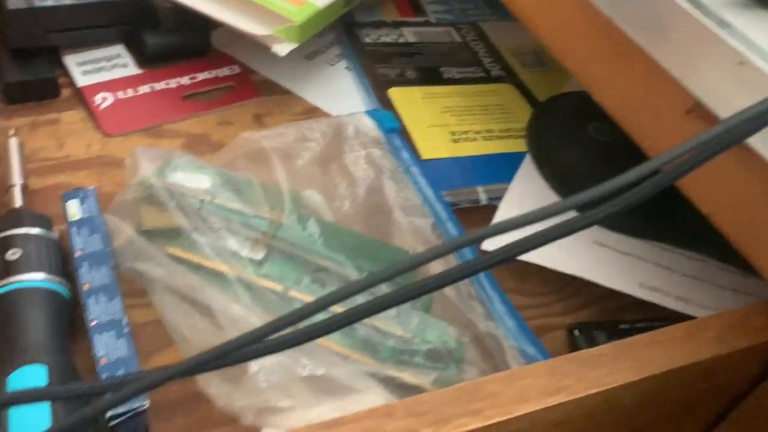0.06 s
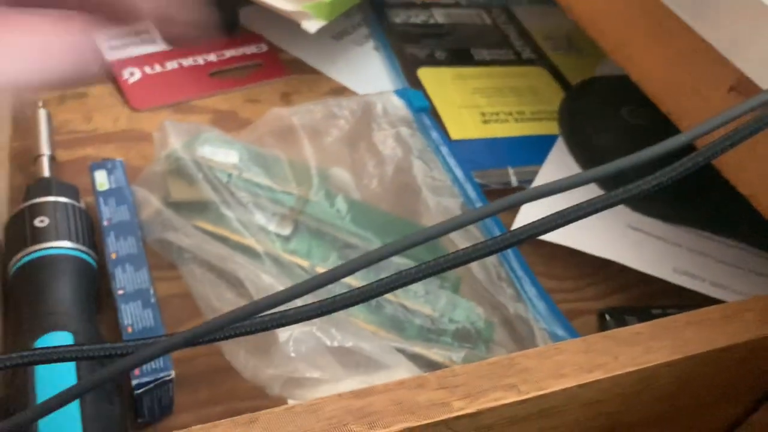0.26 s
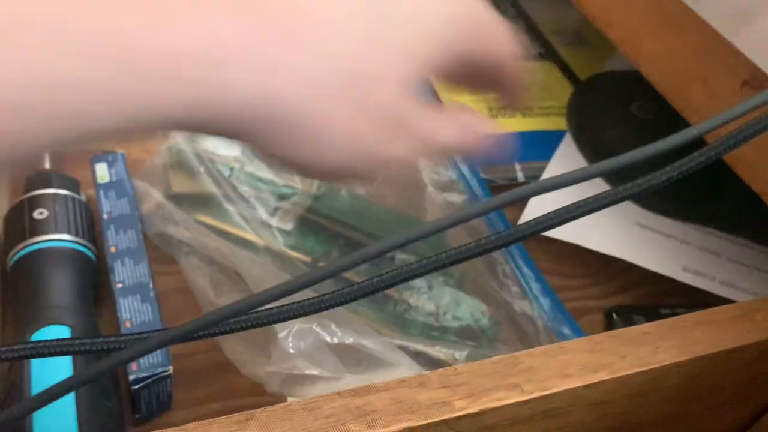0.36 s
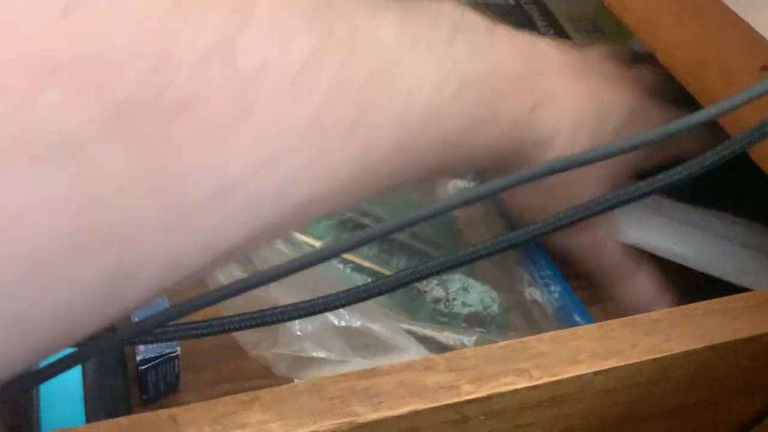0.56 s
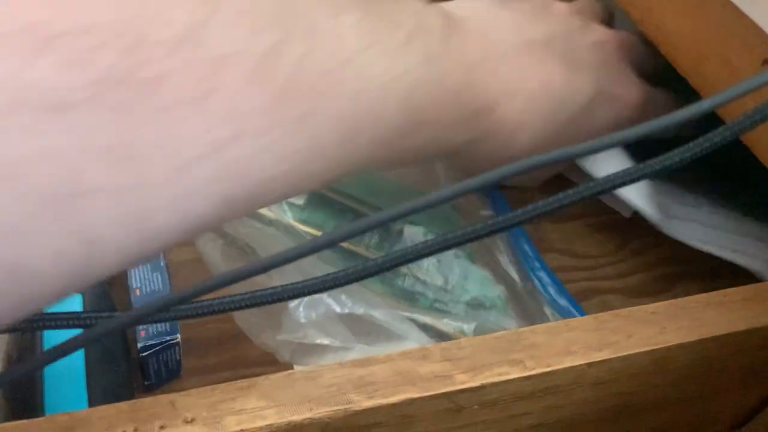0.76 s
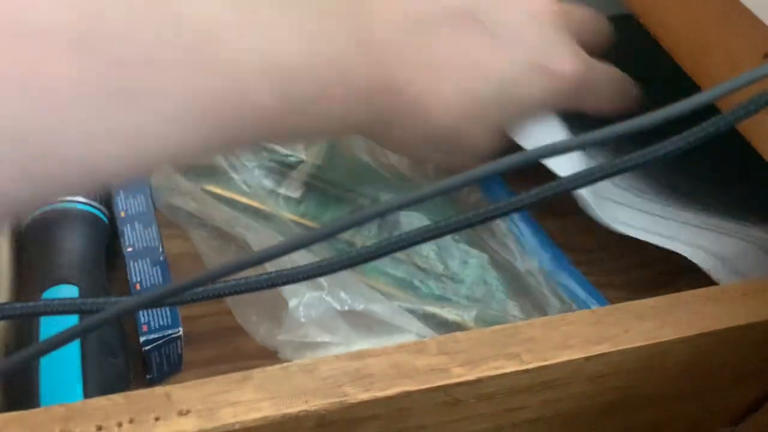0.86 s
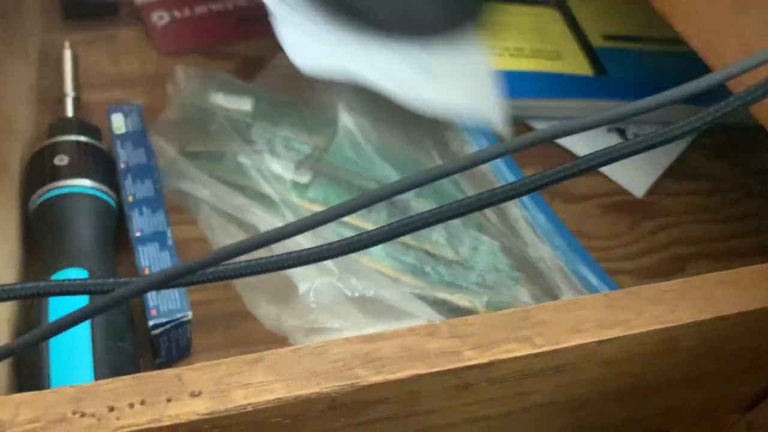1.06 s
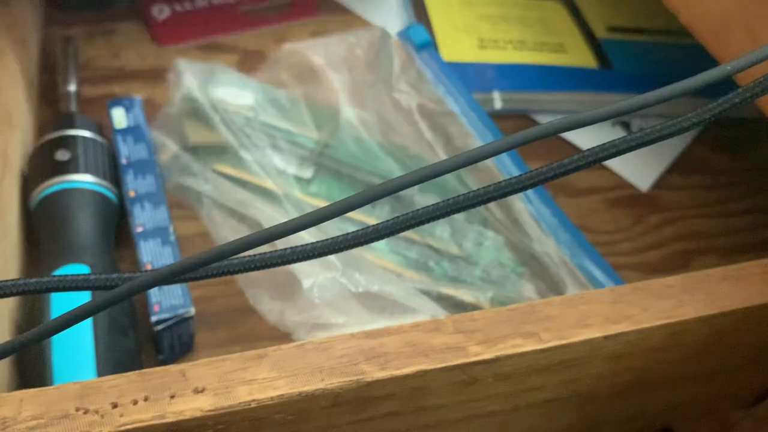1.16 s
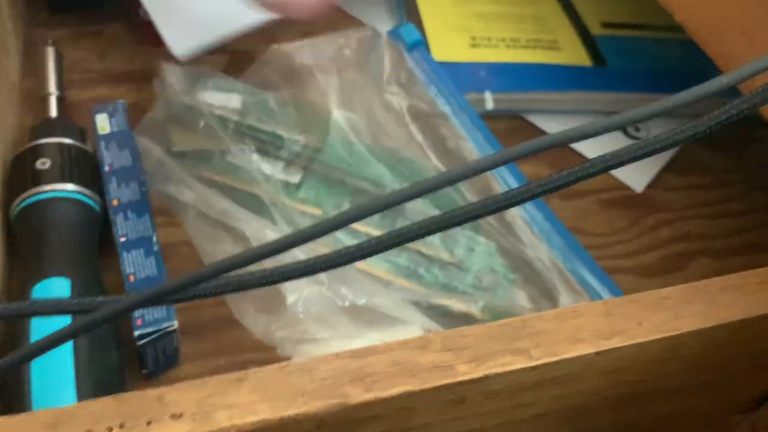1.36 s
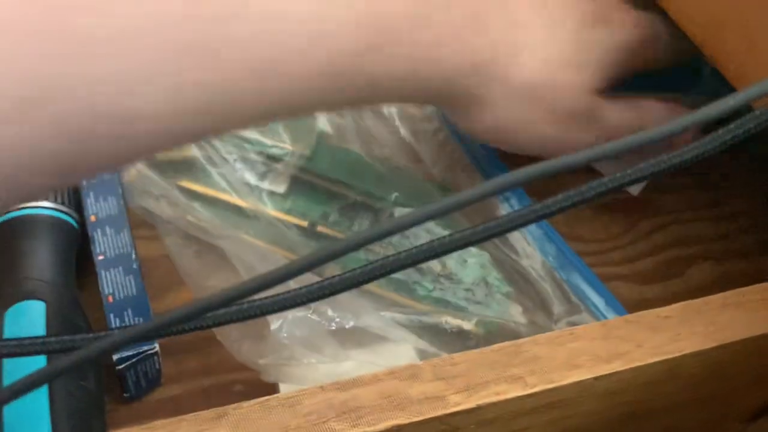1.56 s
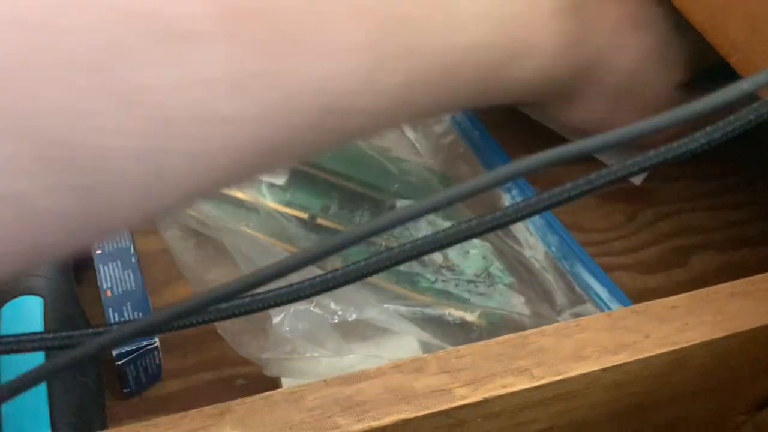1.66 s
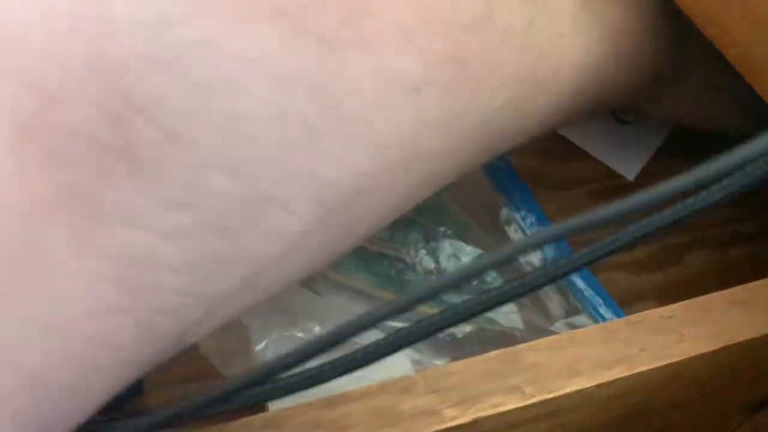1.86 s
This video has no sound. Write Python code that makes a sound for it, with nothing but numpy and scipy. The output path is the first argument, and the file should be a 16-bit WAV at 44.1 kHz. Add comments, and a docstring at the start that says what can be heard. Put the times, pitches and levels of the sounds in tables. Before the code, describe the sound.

Rummaging in a wooden drawer, close, in a small room with low hum and soft airy noise. After 0.2 s of quiet, a short woody judder with a click; a weaker one at 0.5. Plastic clicks crowd 0.5-1.15 over sliding and paper-and-bag rustle, strongest near 1.15. Low thuds gather from 0.87, ending with a firm knock at 1.55. After 1.63, near-silent hiss with tiny ticks around 1.85.

```python
"""A wooden drawer judders under two shoves: noise chopped by quick slips, over decaying panel sines.
Friction noise through the panel resonances is the slide; small plastic clicks are noise cracks with two rings.
Paper and a bag drag as dense catches over a smooth rub, with one short sagging note; arm bumps are damped
low sines over a rumble. All is close, in a small room with hum and airy noise.
Near the end the background drops to a faint hiss and only a few faint ticks remain."""
import sys
import numpy as np
from scipy import signal
from scipy.fft import rfft, irfft, next_fast_len
from scipy.io import wavfile
from scipy.ndimage import uniform_filter1d, map_coordinates

SR = 44100
rng = np.random.default_rng(int(sys.argv[2]) if len(sys.argv) > 2 else 0)


def file_out(sig):
    """Save sig as 16-bit WAV at sys.argv[1]."""
    # one column per channel
    cols = np.atleast_2d(sig).T
    # limit, then scale
    lim = np.clip(cols, -1, 1)
    pcm = np.round(lim * 32767).astype(np.int16)
    wavfile.write(sys.argv[1], SR, pcm)


N = 83790  # samples

# Drawer shoves, levels before source gains: start_s, level_db, rise_s, fall_s, tilt_db_per_octave
SHOVES = [(.214, -25, .029, 0.066, 0), (.486, -36.5, 0.039, 0.12, 0)]
# Panel modes of the drawer: mode_hz, relative_level_db, t60_s
PANEL_MODES = [(157.2, -4.5, 0.34), (220, -1, 0.15), (287.2, -10, 0.6), (385, -17, .26), (419.4, -3, 0.18),
               (468, -13, 0.56), (535, -5, 0.14), (704, -10.5, 0.11), (816, -5, 0.33), (875.6, -2.5, 0.49),
               (956, -7, 0.23), (1122, -8, 0.42), (1374, -9, 0.18), (1664, -12, 0.15), (2330, -18.5, .16),
               (2500, -15.5, 0.14)]
# Spectrum of the slip noise: freq_hz, gain_db
SLIP_COLOUR = [(40, -26.5), (130, -7.5), (230, -0.5), (600, 2), (950, -1), (1600, -13), (2800, -16),
               (3800, -20), (6500, -27), (9000, -45.5), (14000, -61)]
# Heavier thing sliding on the drawer floor: time_s, level_db
SLIDE_LEVEL = [(.2, -57), (.29, -45), (.39, -47.5), (.47, -55.5), (.55, -45), (.62, -51), (.74, -54),
               (.84, -45.5), (.95, -56.5), (1.08, -64), (1.17, -49), (1.28, -63), (1.58, -61), (1.63, -91)]
# Friction spectrum ahead of the panels: freq_hz, gain_db
SLIDE_COLOUR = [(100, -17), (300, -3), (550, 8.5), (900, 0), (1500, -10), (3000, 0.5), (6000, -32)]
# Plastic contacts, levels before CLICK_GAIN_DB:
# start_s, level_db, t60_s, tilt_db_per_octave, first_ring_hz, second_ring_hz, relative_ring_db
CLICKS = [(0.2179, -29, 0.038, -4.5, 2750, 1890, -6), (.408, -48, 0.016, -7, 6440, 3700, -10),
          (.421, -44, .03, -6.5, 3660, 2390, -8), (.501, -49, 0.0089, 3, 6500, 8600, -16),
          (0.51, -32, 0.013, -1, 4050, 3340, -3), (0.5913, -24.5, 0.028, 0.5, 3660, 2290, -8.5),
          (.626, -36, 0.047, -3, 6620, 3170, -9), (0.6421, -33.5, 0.0058, 3, 6900, 8280, -15),
          (0.7092, -40, 0.013, 0, 1140, 6430, -10), (0.7564, -35, 0.013, -3.5, 2400, 1070, -10),
          (0.7623, -33.5, 0.0074, 4, 1144, 930, 2), (0.7906, -44.5, 0.0067, 12.5, 3550, 1200, 1),
          (.7995, -41, 0.021, 12, 4100, 6600, -10), (0.8126, -32, .02, -1, 1160, 3770, -8.5),
          (.828, -33, .014, 5, 6730, 1070, -2), (0.836, -36.5, 0.017, 4.5, 3600, 1210, -3),
          (0.8703, -33, 0.02, 2, 6290, 1160, -4.5), (.8748, -32, 0.019, -6.5, 3380, 1620, -13),
          (.930, -39, 0.019, 3, 4440, 5900, -7), (0.9797, -39, 0.0261, 1, 1190, 1670, -5),
          (1.0257, -34, 0.03, 2.5, 3650, 1150, -6), (1.0532, -36.5, 0.028, 0.5, 2620, 4660, -5),
          (1.136, -34, 0.046, 2, 1720, 2453, -3.5), (1.155, -33.5, 0.025, 1.5, 3500, 2540, -9.5),
          (1.394, -44, 0.03, 0, 4480, 1355, -5), (1.480, -44, 0.025, -1.5, 1310, 2230, -1),
          (1.4944, -32, 0.018, 2, 2277, 4086, -3.5), (1.656, -67.5, 0.012, -6, 4820, 2500, -6.5),
          (1.726, -71, 0.023, -1.5, 2110, 4410, -7), (1.837, -72, 0.048, -5.5, 940, 1150, 0),
          (1.865, -64.5, 0.061, -3, 2420, 985, -6.5), (1.876, -59.5, 0.044, -0.5, 2474, 1530, -6)]
# Spectrum of the cracks: freq_hz, gain_db
CRACK_COLOUR = [(80, -7), (500, 0.5), (1150, 3.5), (1700, -0.5), (2250, -2.5), (2900, -5), (3700, -6),
                (5400, -11.5), (6600, -14), (9500, -23.5), (15000, -30.5)]
# Paper and bag over wood, level before flicker and treble growth: time_s, level_db
DRAG_LEVEL = [(.3, -61.5), (.42, -54), (.48, -55.5), (.57, -62), (.635, -40.5), (.68, -47.5), (.75, -50),
              (.81, -45), (.88, -43.5), (.92, -45), (1.01, -46.5), (1.07, -42), (1.115, -44), (1.16, -38),
              (1.21, -42), (1.33, -49), (1.52, -49.5), (1.615, -52), (1.64, -91.5)]
# Spectrum of the rustle: freq_hz, gain_db
PAPER_COLOUR = [(100, -9), (260, 7), (550, 3.5), (900, -3), (1250, 3), (1950, -1.5), (2450, -5), (2950, -1),
                (3500, -3), (5400, -9), (6600, -12.5), (9500, -29.5), (12000, -34.5), (16000, -40.5)]
# Resonances of paper and drawer hollow: centre_hz, width_hz, gain_db
HOLLOW_PEAKS = [(588, 60, 4.5), (1165, 50, 6.5), (1353, 56, 6.5), (1610, 50, 5), (2426, 95, 7),
                (3340, 200, 3.5), (4600, 300, 3.5), (6600, 500, -1.5)]
# Bumps of arm and contents on the drawer: start_s, level_db, pitch_hz, t60_s, attack_s
BUMPS = [(0.236, -35.5, 60.8, 0.31, .006), (0.523, -37, 70, 0.05, 0.0046), (.872, -26.5, 66, 0.1, .004),
         (1.048, -33.5, 57, 0.094, .008), (1.174, -30.5, 210, 0.11, .003),
         (1.194, -22.5, 88, 0.059, 0.0041), (1.223, -35.5, 138.5, 0.37, .006),
         (1.28, -38, 54.7, 0.082, 0.0069), (1.35, -25.5, 77, 0.094, 0.0048),
         (1.437, -23.5, 60.54, 0.19, 0.013), (1.453, -20.5, 168, 0.028, 0.0033),
         (1.548, -14.5, 276, 0.02, 0.0011), (1.557, -15, 60.5, 0.095, 0.0036),
         (1.583, -27, 180.6, 0.13, 0.002), (1.625, -26.5, 57, 0.068, 0.002)]
# Rumble of things shifting: time_s, level_db
RUMBLE_LEVEL = [(0, -55.5), (.2, -55), (.26, -45), (.45, -48), (.6, -48), (.75, -49), (1, -58.5),
                (1.19, -40), (1.32, -51.5), (1.52, -48), (1.61, -39), (1.67, -78.5)]
# Spectrum of the rumble: freq_hz, gain_db
RUMBLE_COLOUR = [(20, -21), (55, 2), (100, 2), (270, 2), (400, -7.5), (600, -13.5), (1500, -70.5)]
# Hum partials before the drop: pitch_hz, rms_level_db
HUM = [(59.3, -58.5), (119.2, -50), (240, -64), (253, -55.5)]
# Spectrum of the airy noise: freq_hz, gain_db
AIR_COLOUR = [(20, -50), (60, -10), (86, -14), (140, 0), (190, -5), (260, 1), (350, -9), (460, -13),
              (880, -17), (1100, -28), (1600, -32), (2350, -26), (3200, -35), (5000, -42), (7000, -56),
              (10000, -72)]
# Spectrum of the remaining hiss: freq_hz, gain_db
HISS_COLOUR = [(40, 9.5), (300, 2.5), (800, -8.5), (1350, -6.5), (1800, -8.5), (3500, -19), (8500, -9),
               (13000, -27)]
# Reverberation of the small room: freq_hz, t60_s
ROOM_T60 = [(100, 0.25), (900, 0.38), (3000, 0.35), (12000, 0.089)]
# Stereo width, applied to the side signal: freq_hz, side_gain_db
SIDE_GAIN = [(100, -67), (330, -56), (600, -17.5), (950, -3.5), (1500, 1), (2500, -0.5), (12000, -1.5)]
# Microphone difference, faded in above MONO_HZ: freq_hz, left_over_right_db
MIC_BALANCE = [(1100, 0), (2500, 0.9), (5500, 0.1), (8300, -5), (12000, 1)]

JUDDER_HZ, JUDDER_SCATTER_PERIODS, SLIPS_PER_SHOVE = 154, 0.15, 32
SHOVE_START_DB, GRIP_S = -16, 0.0066
SLIP_GAIN_DB, SLIP_T60_S, PANEL_GAIN_DB = 15.5, 0.032, -3
SLIDE_WIDTH_HZ = 16.6
CLICK_GAIN_DB, CLICK_LEAD_SAMPLES = -3.5, 512
CLICK_RISE_S, CLICK_HOLD_S = 0.0012, 0.0022  # grazing before the strike, then a steady top
CATCHES_PER_S, CATCH_LOG_SPREAD, RUB_DB, SCATTER_T60_S = 1000, 0.45, -4, 0.021
PATCH_DB, FLICKER_DB, FLICKER_PER_S = 2, 0.5, 97
TREBLE_HZ, TREBLE_GROWTH, FIRM_DRAG_DB = 7550, 0.85, -56.5  # treble gain 1 at FIRM_DRAG_DB
FLUTTER_START_S, FLUTTER_LENGTH_S, FLUTTER_EDGE_S = 0.811, 0.08, 0.0063
FLUTTER_START_HZ, FLUTTER_SAG_HZ_PER_S, FLUTTER_DB = 148.3, 200, -32
AIR_DB, HISS_DB = -50, -75.5
DROP_START_S, DROP_LENGTH_S, DROP_DB = 1.612, 0.033, -28
SLIP_ROOM_DB, CRACK_ROOM_DB, RING_ROOM_DB = -8, -6.5, -10.5
LOW_CUT_HZ, TOP_HZ, MONO_HZ = 21.5, 16200, 450


def amp(db):
    """Decibels to gain."""
    return 10 ** (np.asarray(db) / 20)


def unit(x):
    """Scaled to rms 1 over all channels."""
    return x / np.sqrt(np.mean(x ** 2) + 1e-20)


def along(points, hz):
    """(freq_hz, value) points interpolated on a log axis."""
    freqs_hz, values = np.transpose(points)
    return np.interp(np.log(hz + 1), np.log(freqs_hz + 1), values)


def since(start_s):
    """Seconds since start_s, zero before it."""
    return np.maximum(np.arange(N) / SR - start_s, 0)


def level(rows):
    """Gain per sample from (time_s, level_db) rows."""
    return amp(np.interp(since(0), *np.transpose(rows)))


def decay(t, t60_s):
    """Exponential decay, 60 dB in t60_s."""
    return np.exp(-np.log(1000) * t / max(t60_s, 1e-4))


def sine(t, hz):
    """Mid and side sines with independent random phases."""
    return np.sin(2 * np.pi * hz * t + rng.uniform(0, 2 * np.pi, (2, 1)))


def filtered(x, response):
    """x through a gain given as a function of frequency."""
    size = next_fast_len(x.shape[-1] + 8192)
    spectrum = rfft(x, size) * response(np.fft.rfftfreq(size, 1 / SR))
    return irfft(spectrum, size)[..., :x.shape[-1]]


def highpass(x, cut_hz):
    """Zero-phase high-pass, -6 dB at cut_hz."""
    return filtered(x, lambda hz: hz ** 4 / (hz ** 4 + cut_hz ** 4))


def colour(x, points, tilt=0):
    """x through a (freq_hz, gain_db) spectrum, tilted in dB per octave above 700 Hz."""
    def response(hz):
        octaves = np.log2(np.maximum(hz, 700) / 700)
        return amp(along(points, hz) + tilt * octaves)
    return filtered(x, response)


def noise(points, tilt=0, size=N):
    """Coloured mid and side noise of rms 1."""
    return unit(colour(rng.standard_normal((2, size)), points, tilt))


def patchy(x, depth_db):
    """Random smoothed patches of gain in time and frequency."""
    z = signal.stft(x, nperseg=512)[2]
    field = uniform_filter1d(rng.standard_normal(z.shape[1:]), size=3, axis=0)  # frequency
    field = uniform_filter1d(field, size=7, axis=1)  # time
    return signal.istft(z * amp(depth_db * unit(field)), nperseg=512)[1][:, :N]


def room(x, wet_db):
    """Adds a decaying-noise tail whose decay time follows ROOM_T60."""
    hz, t, z = signal.stft(rng.standard_normal((2, SR // 2)), SR, nperseg=256)
    fade = np.exp(-np.log(1000) * t / along(ROOM_T60, hz)[:, None])
    tail = signal.istft(z * fade, SR, nperseg=256)[1]
    tail = tail / np.linalg.norm(tail[0])
    return x + amp(wet_db) * signal.fftconvolve(x, tail, axes=1)[:, :N]


def drawer():
    """Shoves: runs of stick-slip noise bursts swell and die; the panels ring on."""
    rattle, ring = np.zeros((2, N)), np.zeros((2, N))
    for start_s, db, rise_s, fall_s, tilt in SHOVES:
        t = since(start_s)
        swell = amp(SHOVE_START_DB * (1 - t / rise_s))
        release = np.exp(-2 * np.abs(t - rise_s) / fall_s)
        force = np.minimum(t / GRIP_S, 1) * np.where(t < rise_s, swell, release)
        scatter = JUDDER_SCATTER_PERIODS * rng.standard_normal(SLIPS_PER_SHOVE)
        slips_s = start_s + (np.arange(SLIPS_PER_SHOVE) + scatter) / JUDDER_HZ
        judder = sum((since(s) > 0) * decay(since(s), SLIP_T60_S) for s in slips_s)
        bursts = amp(db + SLIP_GAIN_DB) * force * judder * rng.standard_normal((2, N))
        rattle += colour(bursts, SLIP_COLOUR, tilt)
        for hz, mode_db, t60_s in PANEL_MODES:
            shape = np.minimum(t / rise_s, 1) * decay(since(start_s + rise_s), t60_s)
            ring += amp(db + PANEL_GAIN_DB + mode_db) * shape * sine(t, hz)
    return room(rattle, SLIP_ROOM_DB) + ring


def slide():
    """Friction noise keeps the panels sounding through parallel resonators."""
    def panels(f):
        total = 0
        for k, (hz, db, _) in enumerate(PANEL_MODES):
            damping = 1j * f * SLIDE_WIDTH_HZ
            total = total + (-1) ** k * amp(db) * damping / (hz ** 2 - f ** 2 + damping)
        return total
    return level(SLIDE_LEVEL) * unit(filtered(noise(SLIDE_COLOUR), panels))


def clicks():
    """Contacts: a short noise crack with two rings, mostly softer, of the object touched."""
    cracks, rings = np.zeros((2, N + SR)), np.zeros((2, N + SR))
    t = (np.arange(4096) - CLICK_LEAD_SAMPLES) / SR
    graze = np.exp(np.minimum(t, 0) / CLICK_RISE_S)
    for start_s, db, t60_s, tilt, first_hz, second_hz, ring_db in CLICKS:
        fall = decay(np.maximum(t - CLICK_HOLD_S, 0), t60_s)
        shape = amp(db + CLICK_GAIN_DB) * graze * fall
        first = round(start_s * SR) - CLICK_LEAD_SAMPLES
        span = slice(first, first + len(t))
        cracks[:, span] += shape * noise(CRACK_COLOUR, tilt, size=len(t))
        for hz in (first_hz, second_hz):
            rings[:, span] += shape * np.sqrt(2) * amp(ring_db) * sine(t, hz)
    return room(cracks[:, :N], CRACK_ROOM_DB) + room(rings[:, :N], RING_ROOM_DB)


def paper():
    """Random catches over a smooth rub, scattered, coloured by the hollow; firmer drag is brighter."""
    hits = rng.random(N) < CATCHES_PER_S / SR
    sizes = np.exp(CATCH_LOG_SPREAD * rng.standard_normal(N))
    catches = hits * sizes * rng.choice([-1, 1], N)
    scatter = rng.standard_normal((2, 2048)) * decay(np.arange(2048) / SR, SCATTER_T60_S)
    grit = unit(signal.fftconvolve(catches[None], scatter, axes=1)[:, :N])
    grit = grit + amp(RUB_DB) * rng.standard_normal((2, N))

    def hollow(hz):
        return amp(sum(db / (1 + (2 * (hz - centre_hz) / width_hz) ** 2)
                       for centre_hz, width_hz, db in HOLLOW_PEAKS))

    rustle = colour(patchy(grit, PATCH_DB), PAPER_COLOUR)
    rustle = unit(filtered(rustle, hollow))
    flicker = map_coordinates(rng.standard_normal(1024), [since(0) * FLICKER_PER_S])
    drag = level(DRAG_LEVEL) * amp(FLICKER_DB * flicker)
    treble = highpass(rustle, TREBLE_HZ)
    treble_gain = (drag / amp(FIRM_DRAG_DB)) ** TREBLE_GROWTH
    return drag * (rustle - treble + treble * treble_gain)


def flutter():
    """A bending sheet: one low sine whose pitch sags linearly."""
    t = since(FLUTTER_START_S)
    shape = np.clip(np.minimum(t, FLUTTER_LENGTH_S - t) / FLUTTER_EDGE_S, 0, 1)
    cycles = FLUTTER_START_HZ * t - FLUTTER_SAG_HZ_PER_S * t ** 2 / 2
    return amp(FLUTTER_DB) * shape * np.sin(2 * np.pi * cycles)


def bumps():
    """Thuds as damped sines, mid only, over the noise rumble of shifting things."""
    out = level(RUMBLE_LEVEL) * noise(RUMBLE_COLOUR)
    for start_s, db, hz, t60_s, attack_s in BUMPS:
        t = since(start_s)
        shape = (1 - np.exp(-t / attack_s)) * decay(t, t60_s)
        out[0] += amp(db) * shape * np.sin(2 * np.pi * hz * t)
    return out


def background():
    """Hum sines and fan-like airy noise, which drop near the end, over a constant faint hiss."""
    t = since(0)
    hum = sum(np.sqrt(2) * amp(db) * np.sin(2 * np.pi * (hz * t + rng.random())) for hz, db in HUM)
    air = amp(AIR_DB) * noise(AIR_COLOUR)
    drop = amp(DROP_DB * np.minimum(since(DROP_START_S) / DROP_LENGTH_S, 1))
    return drop * (hum + air) + amp(HISS_DB) * noise(HISS_COLOUR)


def scene():
    """Sums the sources as mid and side, narrow in the bass and wide in the treble; returns left, right."""
    mid, side = drawer() + slide() + clicks() + paper() + flutter() + bumps() + background()
    side = filtered(side, lambda hz: amp(along(SIDE_GAIN, hz)))
    return np.array([mid + side, mid - side])


def record(dry):
    """Two microphones: deepest bass cut, slightly different treble, nothing above TOP_HZ."""
    def microphones(hz):
        fade_in = np.clip(hz / MONO_HZ - 1, 0, 1)  # full from twice MONO_HZ
        half_each = np.array([[0.5], [-0.5]])
        return amp(along(MIC_BALANCE, hz) * fade_in * half_each) * (hz < TOP_HZ)
    return filtered(highpass(dry, LOW_CUT_HZ), microphones)


dry = scene()
out = record(dry)
file_out(out)
```